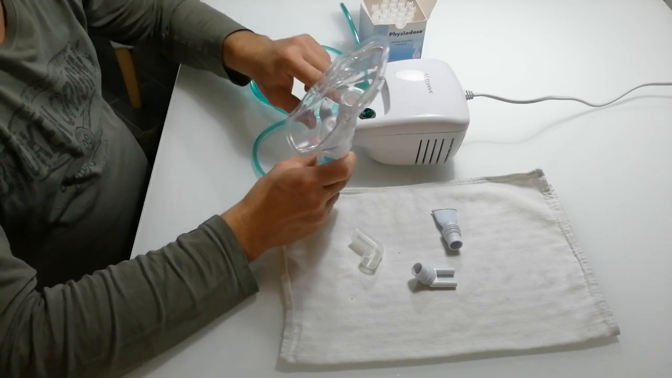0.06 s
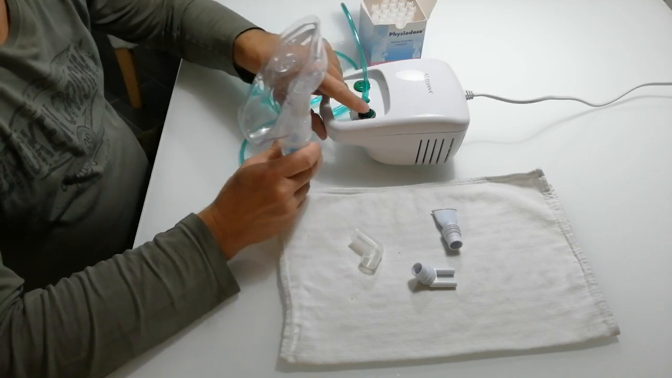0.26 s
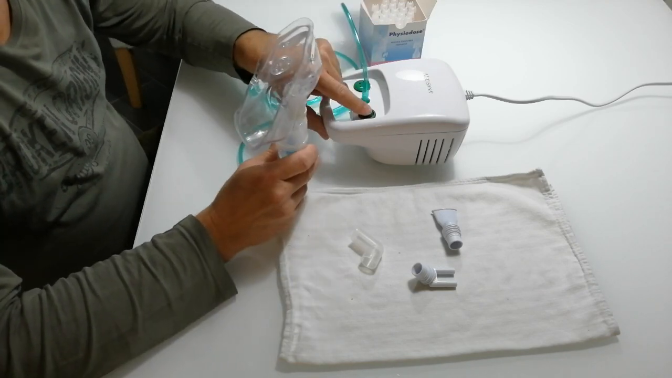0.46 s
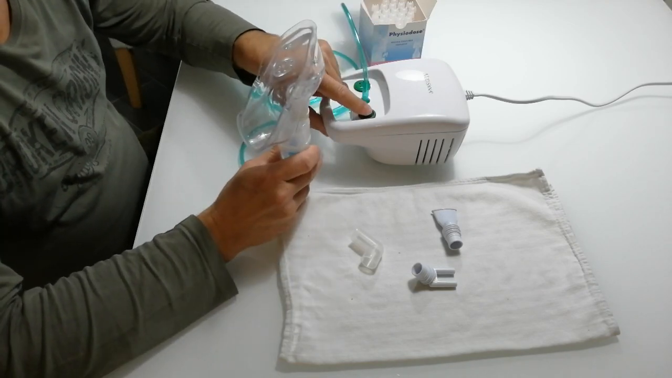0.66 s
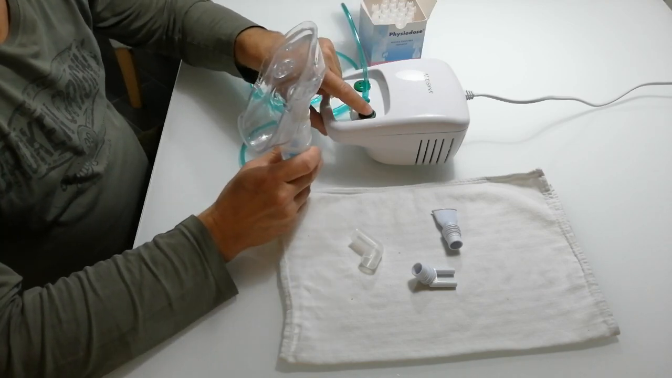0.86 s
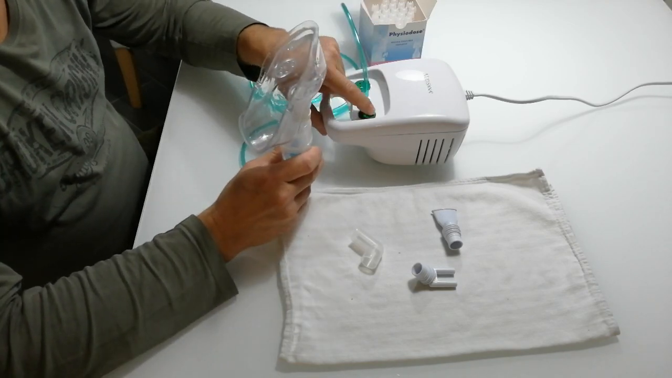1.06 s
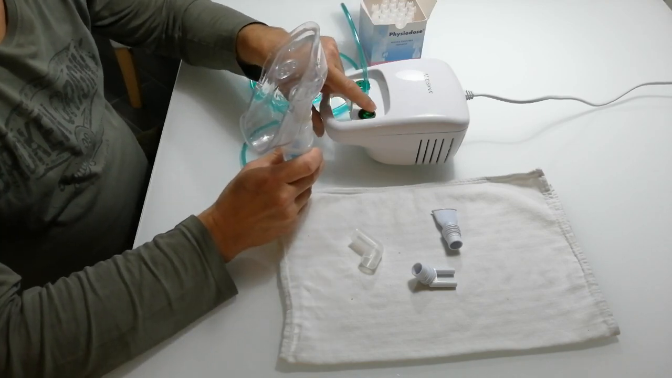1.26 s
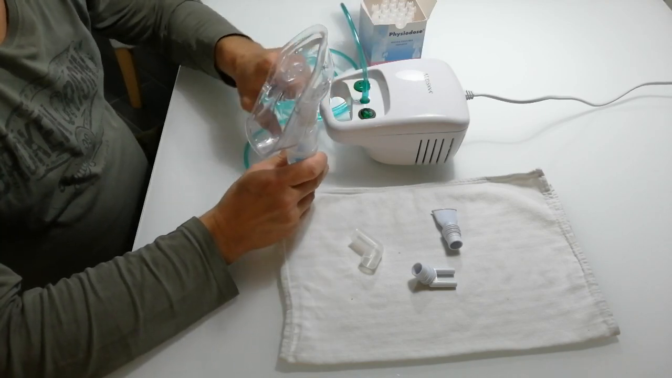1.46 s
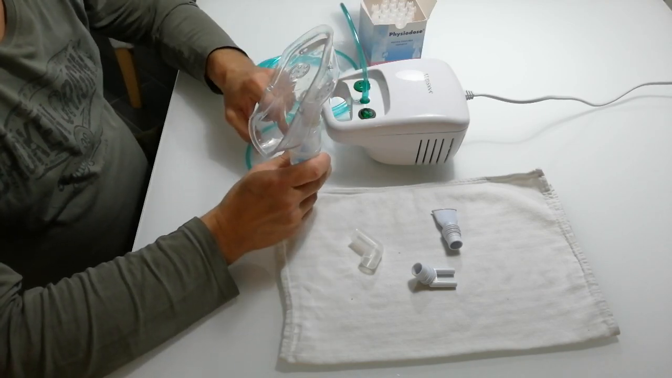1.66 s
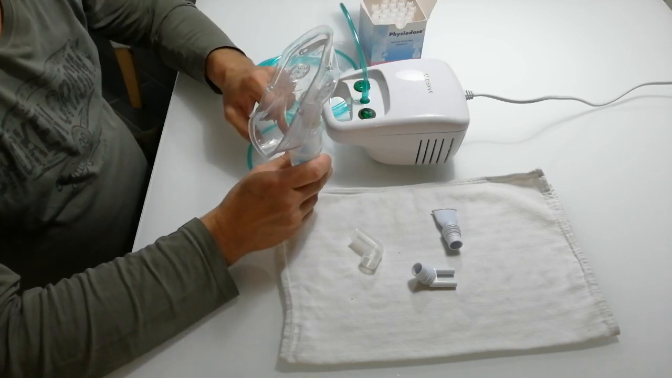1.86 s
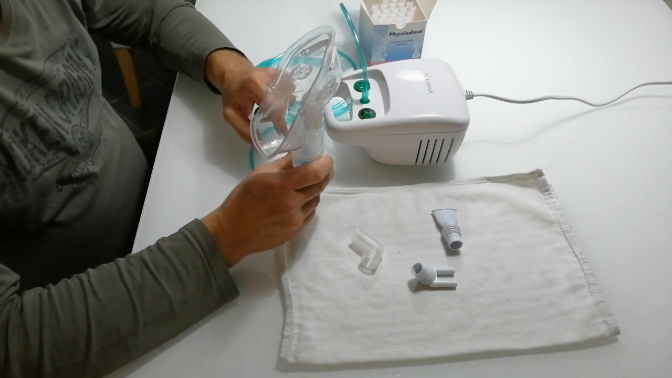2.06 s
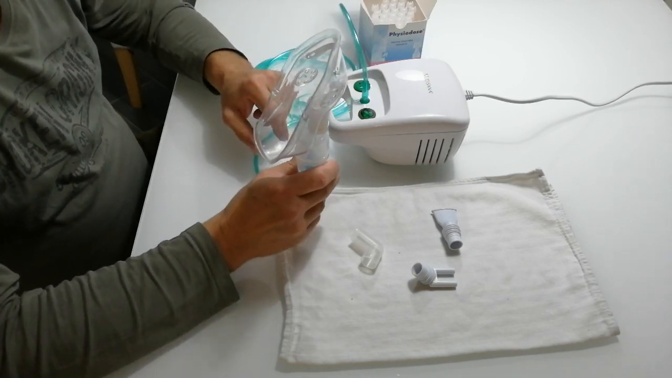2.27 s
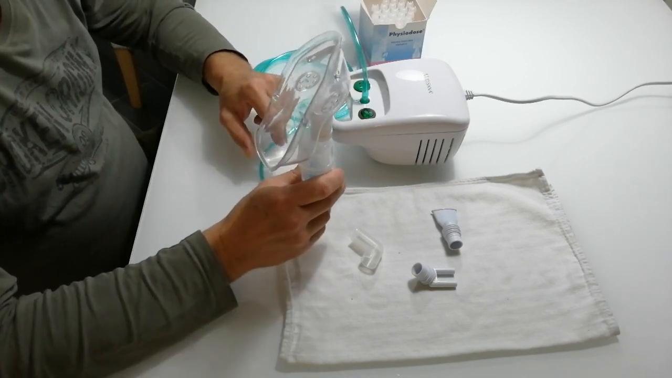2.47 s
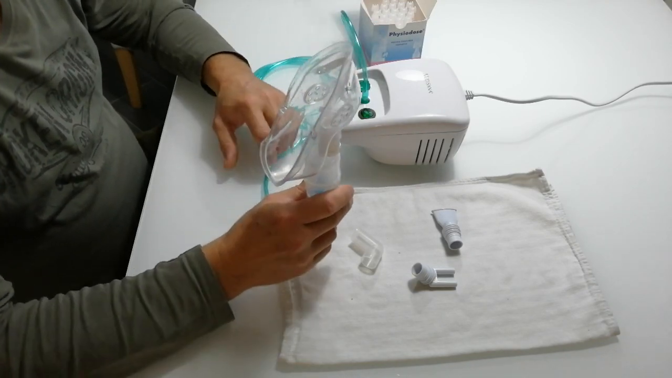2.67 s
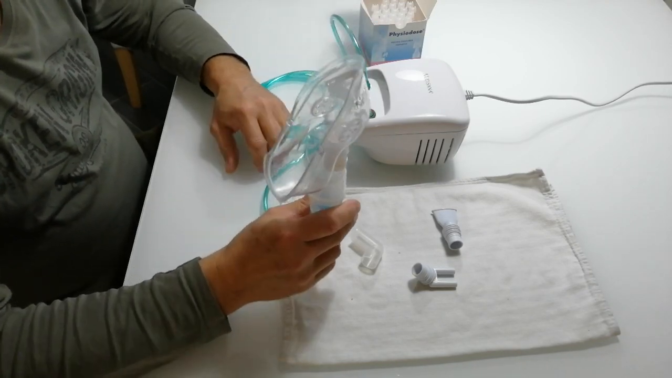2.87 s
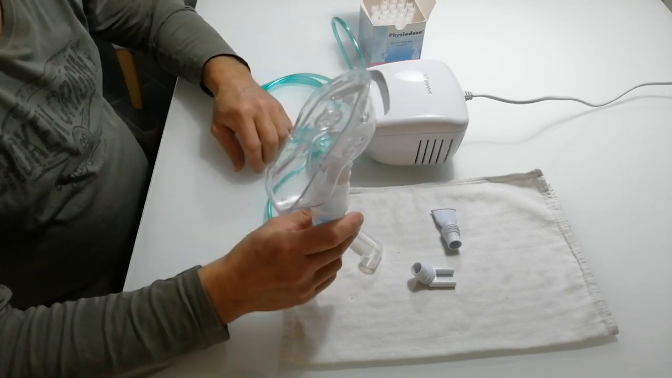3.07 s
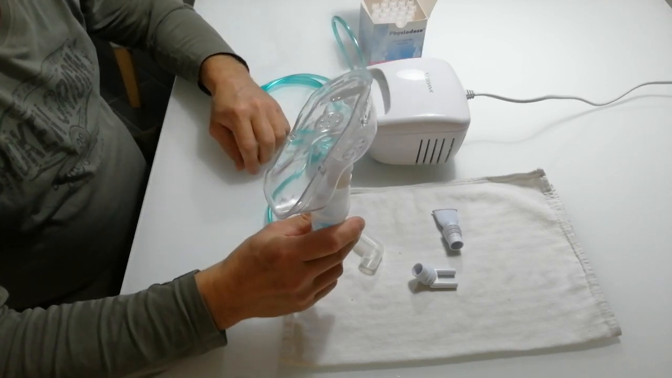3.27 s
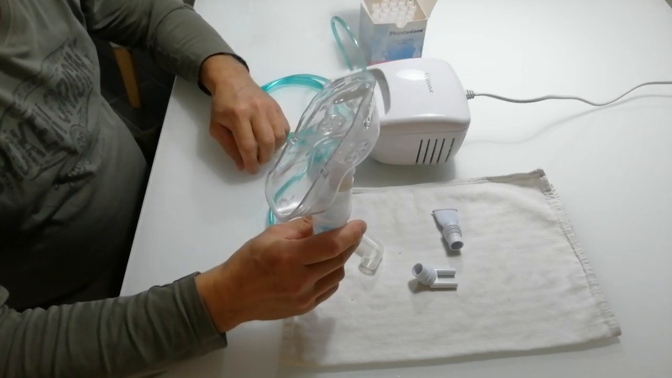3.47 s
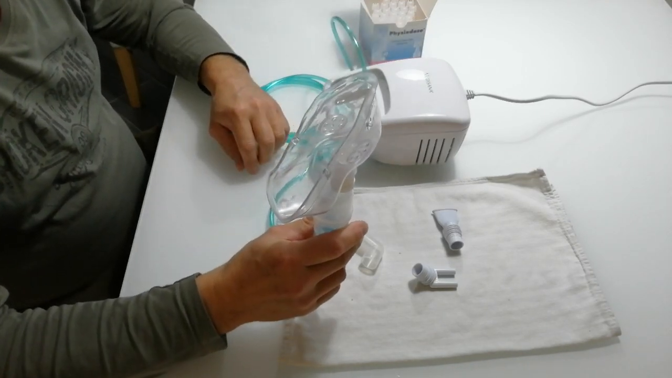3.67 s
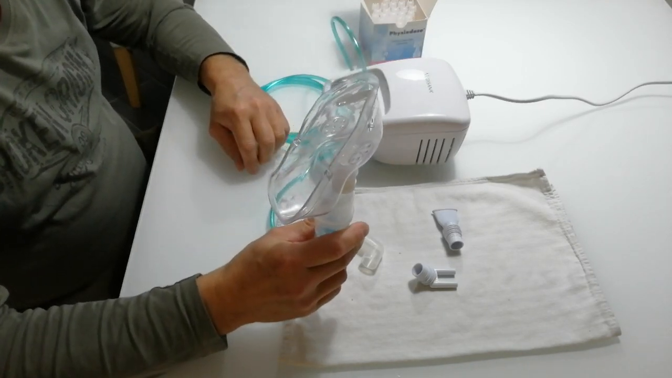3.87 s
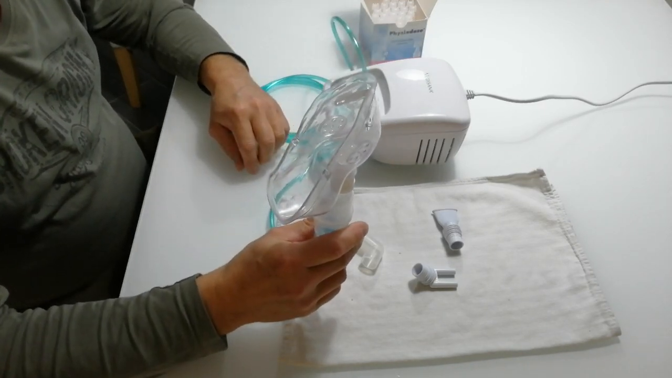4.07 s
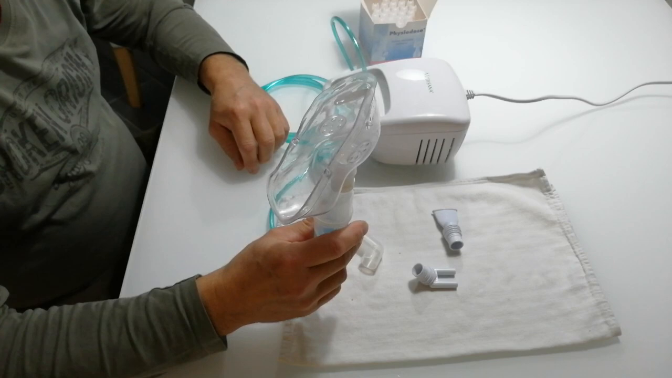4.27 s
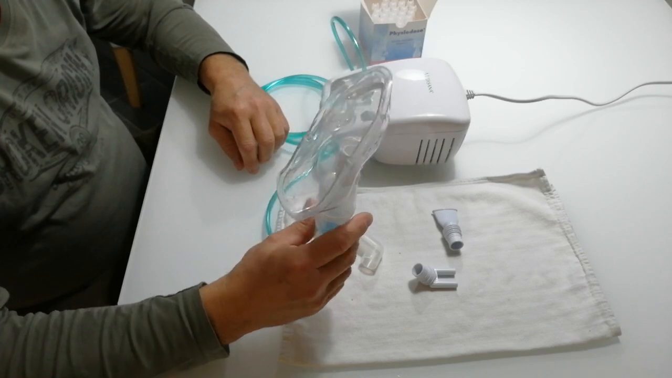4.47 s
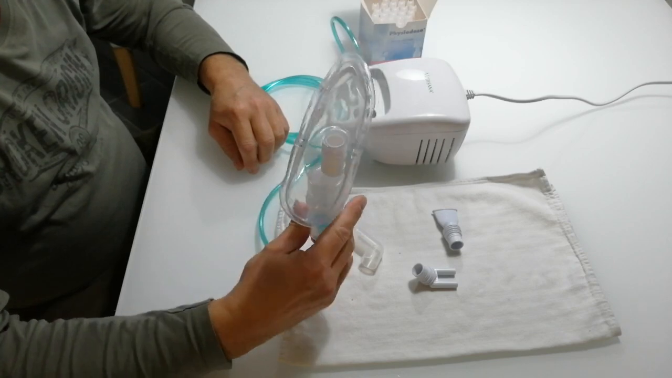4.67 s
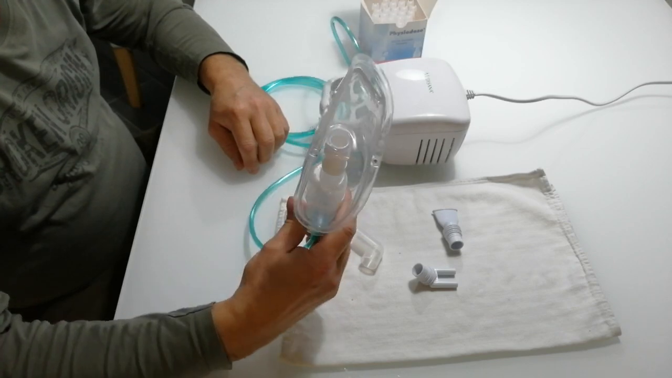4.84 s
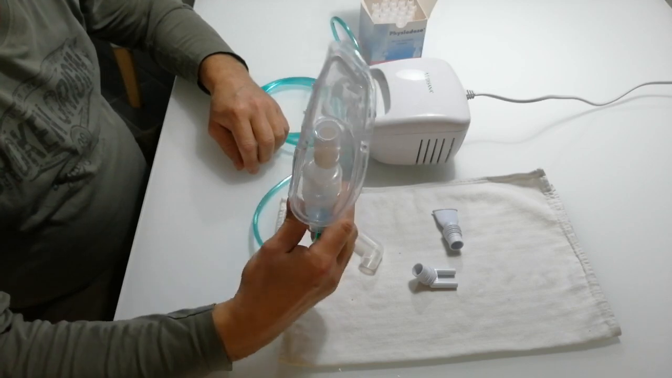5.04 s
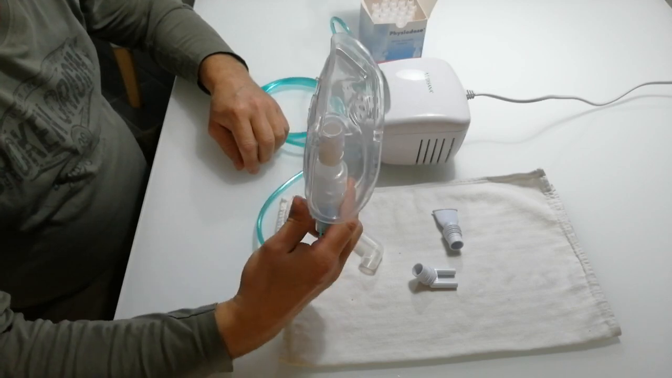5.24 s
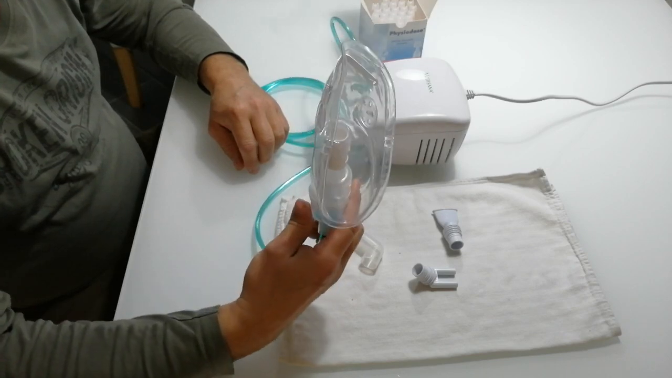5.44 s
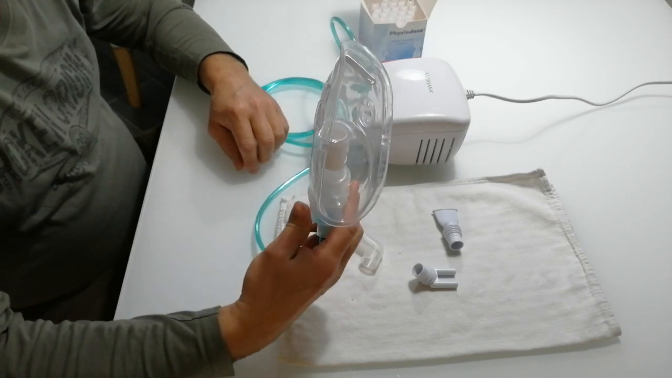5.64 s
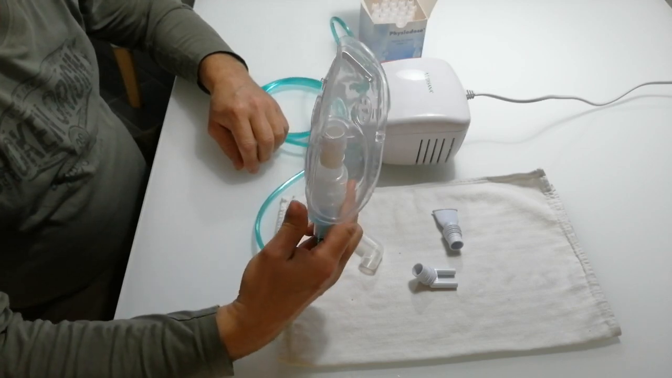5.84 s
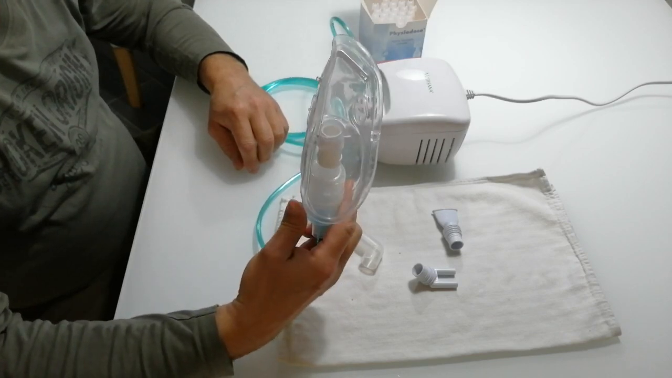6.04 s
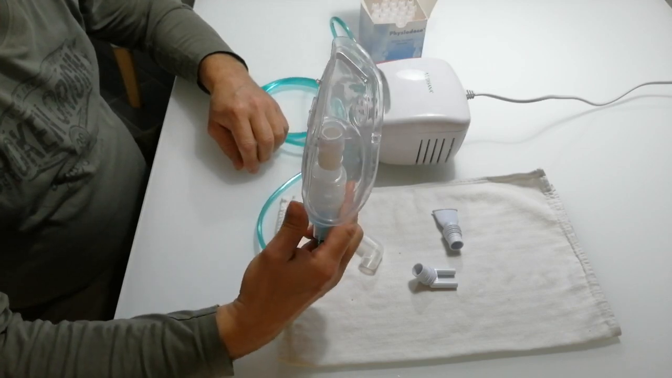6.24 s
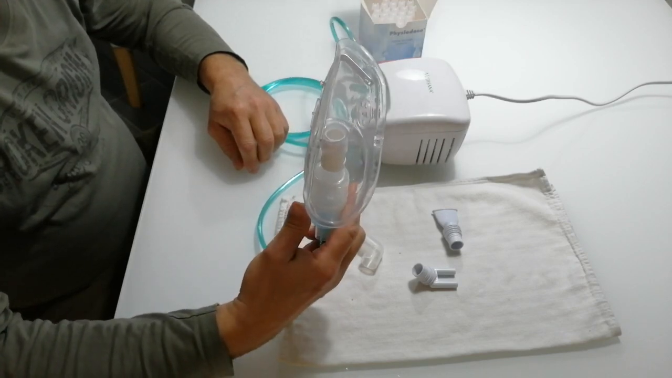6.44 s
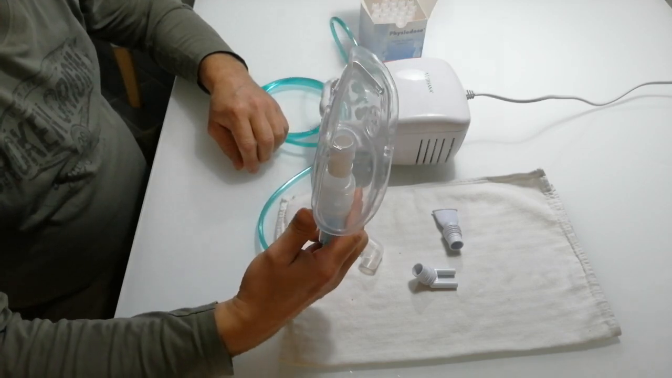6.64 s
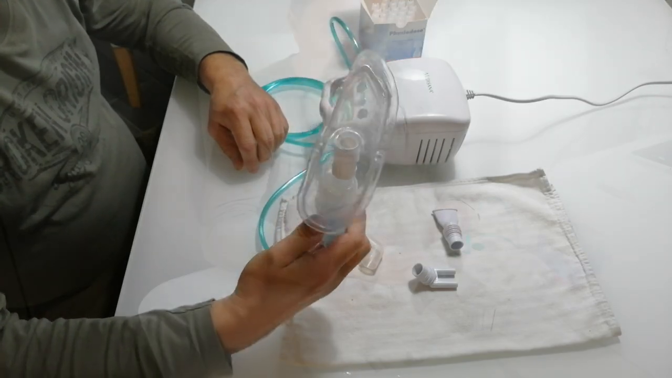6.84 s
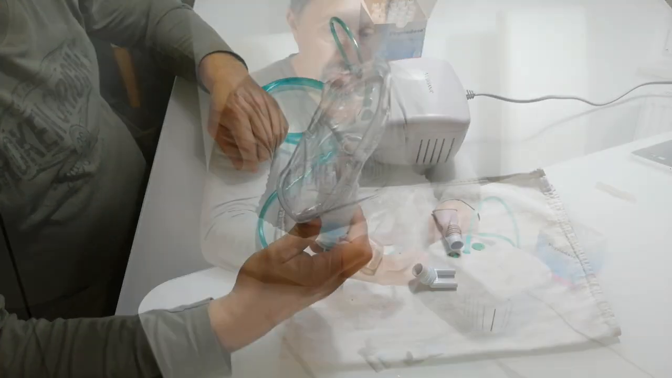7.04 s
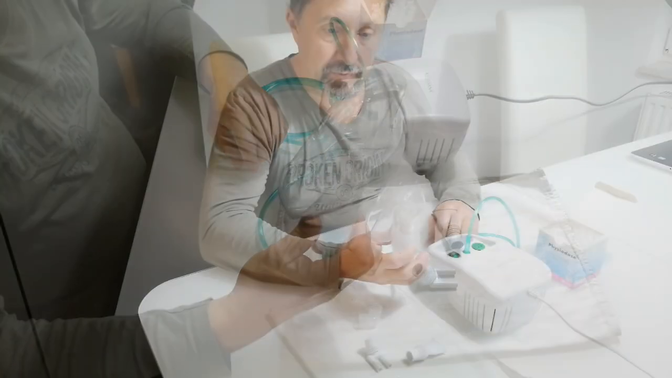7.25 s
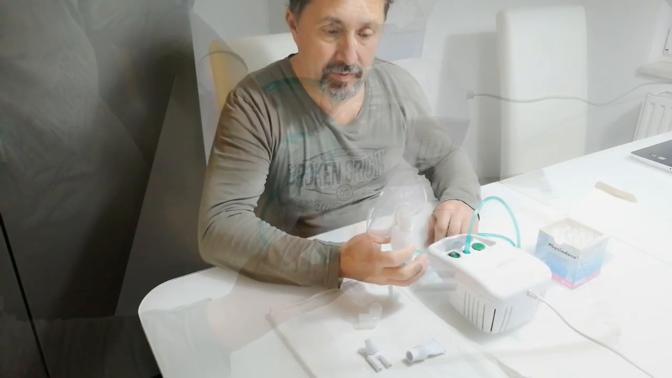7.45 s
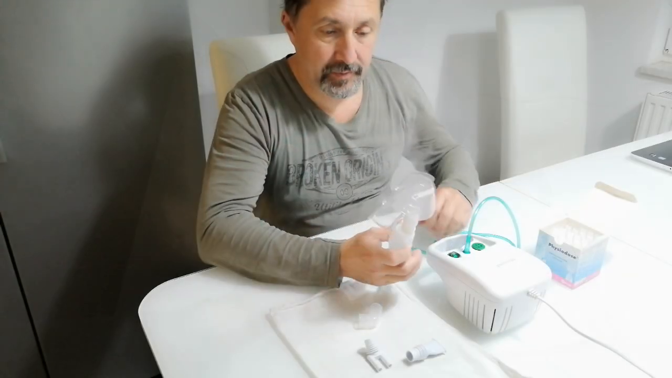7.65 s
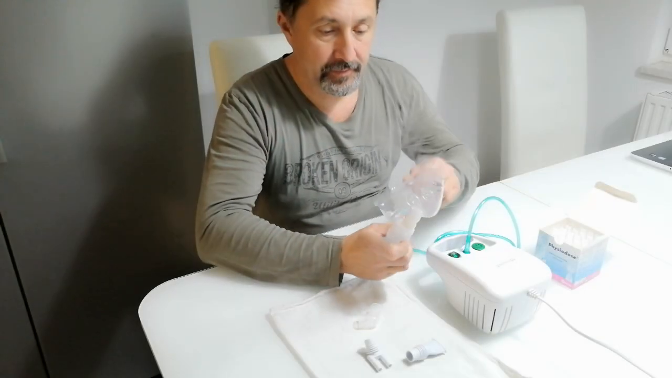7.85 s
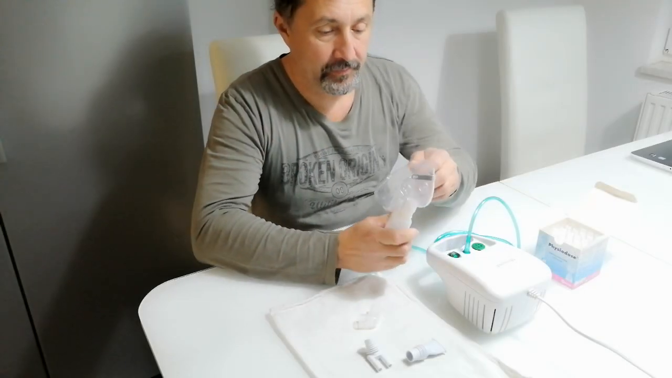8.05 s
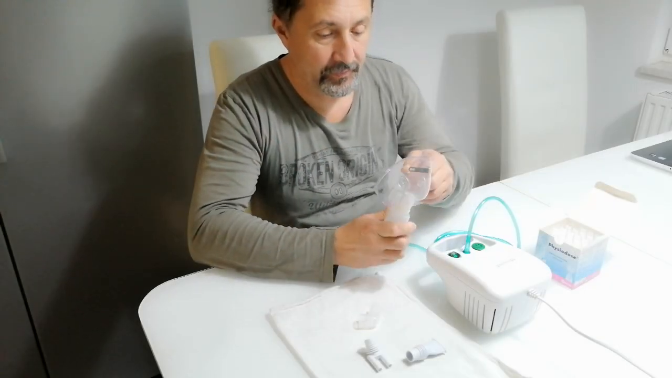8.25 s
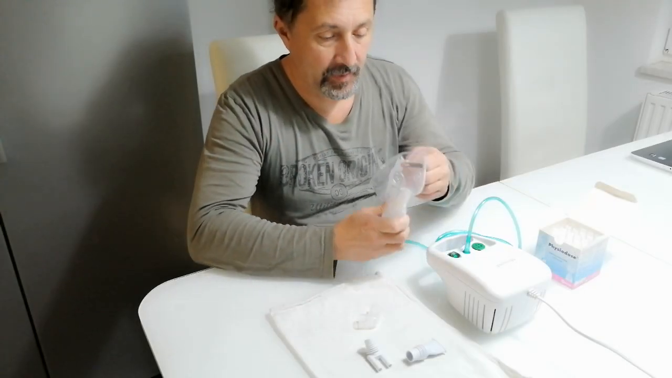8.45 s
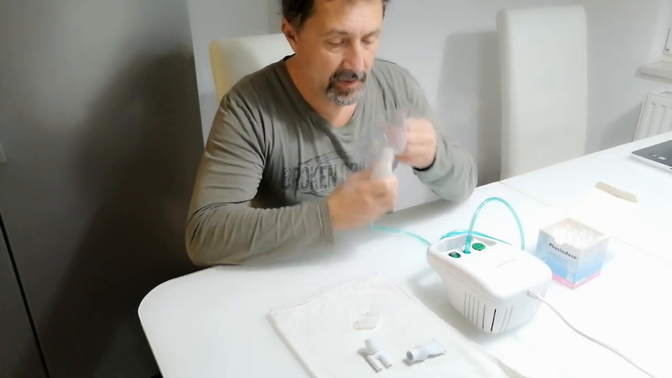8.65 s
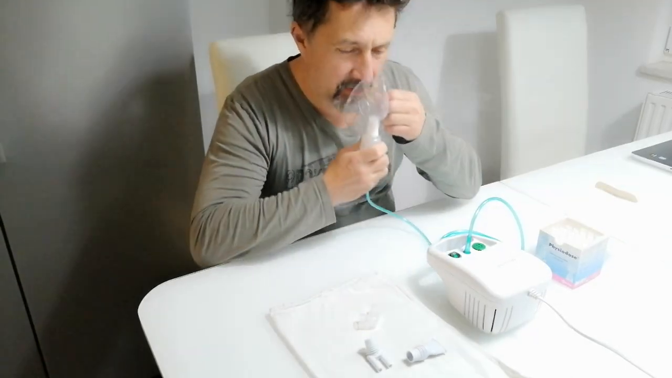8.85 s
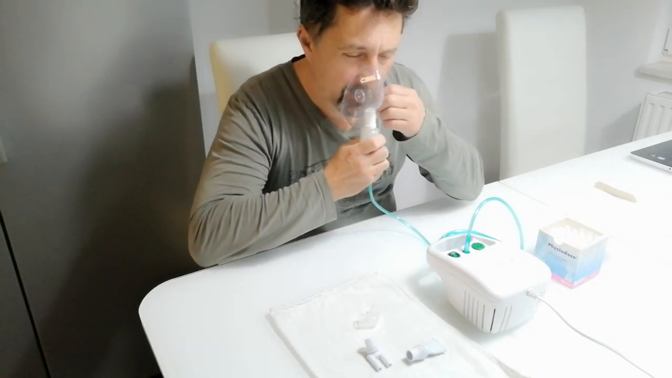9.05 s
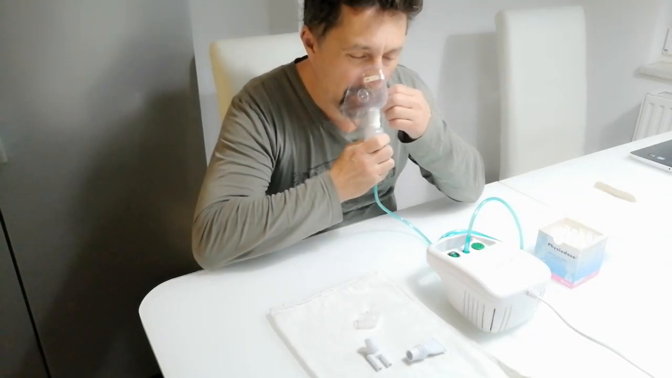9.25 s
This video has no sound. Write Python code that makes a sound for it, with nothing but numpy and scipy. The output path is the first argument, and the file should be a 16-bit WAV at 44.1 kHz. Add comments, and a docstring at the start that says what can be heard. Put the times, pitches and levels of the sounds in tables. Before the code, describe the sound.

In a quiet room, soft table bumps and a low rub, then a switch snaps and a small compressor buzzes steadily with hissing air.

```python
"""A small piston nebulizer on a table in a quiet room. Soft bumps boom the table's low modes, fingers brush
the plastic and something rubs out a low groan. The switch snaps, then the pump's piston orders hum at about
43 strokes a second while filtered noise makes the air jet hiss in the hand-held medicine cup. More bumps follow.
Later the listening point dissolves to a place further from the table: the hum changes colour, the jet and the
bass recede, and thin bands of noise whistle over the rim of the mask."""
import sys
import numpy as np
from scipy import signal
from scipy.fft import rfft, irfft
from scipy.io import wavfile
from scipy.ndimage import uniform_filter1d, map_coordinates

SR = 44100
rng = np.random.default_rng(int(sys.argv[2]) if len(sys.argv) > 2 else 0)


def waveform_to_disk(signal):
    """Save audio, clipped to [-1, 1], as 16-bit WAV at the path in sys.argv[1]."""
    frames = np.transpose(np.atleast_2d(signal))
    scaled = np.clip(frames, -1, 1) * 32767
    samples = np.round(scaled).astype(np.int16)
    wavfile.write(sys.argv[1], SR, samples)


N = 410571
T = np.arange(N) / SR

MOTOR_ON_S = 1.24

# outline of the nozzle's high sizzle, also of brushed plastic: (frequency [Hz], level [dB])
NOZZLE_OUTLINE = [(9000, -9.5), (10000, -8), (10600, 3), (11200, 7), (11700, 3.5), (12500, 3.5),
                  (13000, -3), (14000, -10.5), (15200, -9)]
# outline of the cooling air through the vents, also of the rumble on the feet: (frequency [Hz], level [dB])
VENT_OUTLINE = [(20, -34), (40, -11), (70, -20), (150, -1.5), (350, -6), (620, 5.5), (850, -10.5),
                (1300, -10.5), (1700, -28), (2500, -21.5), (5000, -34)]


def undb(db):
    """Decibels to gain."""
    return 10 ** (np.asarray(db) / 20)


def curve(rows, axis=1):
    """One column of a table, joined by straight lines in time."""
    rows = np.array(rows)
    return np.interp(T, rows[:, 0], rows[:, axis])


def unit(x):
    """Scale to rms 1."""
    return x / np.sqrt(np.mean(x ** 2))


def colour(x, points):
    """Filter by a (frequency [Hz], level [dB]) outline, straight over log frequency, and scale to rms 1."""
    hz, db = np.transpose(points)
    f = np.maximum(np.fft.rfftfreq(2 ** 19, 1 / SR), 1)
    gain = undb(np.interp(np.log(f), np.log(hz), db))
    spectrum = rfft(x, 2 * (len(f) - 1))
    return unit(irfft(spectrum * gain)[..., :N])


def noise(points, side):
    """Coloured stereo noise; side weighs the part that is opposite in the two ears."""
    mid, other = rng.standard_normal((2, N))
    return colour(np.array([mid + side * other, mid - side * other]), points)


def walk(rate):
    """Random wander with a spread near 1, taking rate new values a second."""
    steps = rng.standard_normal(2048)
    return np.interp(T * rate, np.arange(len(steps)), steps)


def pan(db):
    """Gains for a left-minus-right level."""
    return undb(np.array([[db], [-db]]) / 2)


def fall(start, t60):
    """A decay that begins at start and loses 60 dB in t60 seconds."""
    return (T >= start) * undb(-60 * np.maximum(T - start, 0) / t60)


def ramp(start, length):
    """A straight rise from 0 to 1."""
    return np.clip((T - start) / length, 0, 1)


def swell(peak, rise, decay):
    """A smooth bell with its own time for each flank."""
    return np.exp(-((T - peak) / np.where(T < peak, rise, decay)) ** 2)


def note(full, attack, hold, t60):
    """Attack up to the time full, hold, then an exponential release."""
    release = np.exp(-np.log(1000) * np.maximum(T - full - hold, 0) / t60)
    return ramp(full - attack, attack) * release


def settle(time_constant):
    """An approach from 0 to 1 that begins when the motor starts."""
    return 1 - np.exp(-np.maximum(T - MOTOR_ON_S, 0) / time_constant)


def thin(x, hz):
    """Take the bass away."""
    return signal.sosfilt(signal.butter(2, hz, "high", fs=SR, output="sos"), x)


def shelf(x, hz, db):
    """Raise or lower everything above hz by db."""
    high = signal.sosfiltfilt(signal.butter(4, hz, "high", fs=SR, output="sos"), x)
    return x + (undb(db) - 1) * high


def reflections(x, t60):
    """Dense wall echoes, different at each ear, from a decaying noise tail."""
    t = T[:SR // 2]
    tail = rng.standard_normal((2, len(t))) * np.exp(-np.log(1000) * t / t60) * (t > .003)
    tail = tail / np.sqrt(np.sum(tail ** 2) / 2)
    return signal.fftconvolve(x[None], tail, axes=1)[:, :N]


def strokes(turns, orders, scatter, flutter_db, spread):
    """One causal knock of the piston per turn, as a stack of orders; the room smears the higher ones between the ears."""
    k, db = np.transpose(orders)
    # the minimum phase that belongs to the order levels packs each knock's energy at its start
    size = 256
    cepstrum = irfft(np.log(undb(np.interp(np.arange(size // 2 + 1), k, db))))
    lag = rfft(2 * cepstrum[:size // 2], size).imag
    out = np.zeros((2, N))
    for order, gain in zip(k.astype(int), undb(db)):
        smear, apart = rng.standard_normal(2)
        angle = (2 * np.pi * (order * turns % 1) + lag[order] + scatter * smear).astype(np.float32)
        width = np.float32(min(spread * order, 1) * np.sign(apart) / 2)
        flutter = 1 + (undb(flutter_db) - 1) * walk(25)
        out += gain * flutter * np.array([np.sin(angle + width), np.sin(angle - width)])
    return unit(out)


def compressor(pressure, far):
    """Piston orders slow and change colour as the pump takes up its load; the strokes come slightly unevenly."""
    # what the housing radiates running free: (multiple of the stroke rate, level [dB])
    free_orders = [(1, -19.5), (2, -16.5), (3, -20), (4, -6), (5, -18), (6, -28.5), (7, -14.5), (8, -10),
                   (9, -10), (10, -24), (11, -6), (12, -39), (13, -5), (14, -2), (15, -5.5), (16, -28),
                   (17, -38), (18, -15), (19, -29)]
    # what it radiates under pressure: (multiple of the stroke rate, level [dB])
    loaded_orders = [(1, -15.5), (2, -8.5), (3, -13), (4, 2), (5, -4.5), (6, -15), (7, 1.5), (8, -14.5),
                     (9, -9), (10, -0.5), (11, -5), (12, 1.5), (13, 2), (14, 4.5), (15, -5), (16, -10),
                     (17, -7.5), (18, -7), (19, -26), (20, -13), (21, -33.5), (22, -9.5), (23, -41),
                     (24, -15), (25, -17), (26, -5), (27, -20.5), (28, -15.5), (29, -11), (30, -8.5),
                     (31, -11), (32, -23.5), (33, -17), (34, -18.5), (35, -43.5), (36, -18.5), (37, -44),
                     (38, -31), (39, -62), (40, -37), (41, -70), (42, -42), (43, -18.5), (44, -34),
                     (45, -16), (46, -28.5), (47, -26), (48, -23)]
    # what arrives further off: (multiple of the stroke rate, level [dB])
    far_orders = [(1, -37), (2, -27), (3, -33), (4, -12), (5, -22), (6, -34), (7, -15), (8, -15), (9, -13),
                  (10, -20), (11, -16), (12, -22), (13, -18), (14, 0), (15, -22), (16, -23), (17, -34),
                  (18, -37), (19, -41), (20, -33), (21, -37), (22, -34), (23, -42), (24, -28), (25, -25),
                  (26, -34), (27, -30), (28, -25), (29, -25), (30, -39), (31, -32), (32, -35), (33, -27),
                  (34, -40), (35, -32), (36, -38), (37, -37)]
    loaded_speed_hz, sag_hz, sag_time_s, far_speed_hz = 42.82, 2.25, .55, 43.27
    free_db, loaded_db, far_db = -35, -37, -35

    # the speed sags as back pressure builds in the hose
    speed = loaded_speed_hz + sag_hz * (1 - settle(sag_time_s))
    turns = np.cumsum(speed) / SR + .0013 * walk(40)
    load = ramp(1.38, .9)
    running = ramp(MOTOR_ON_S, .16) ** 2 * undb(free_db + (loaded_db - free_db) * pressure)
    free = strokes(turns, free_orders, scatter=0.97, flutter_db=2.0, spread=0.1)
    loaded = strokes(turns, loaded_orders, scatter=.15, flutter_db=.5, spread=.055)
    # the loaded hum slowly grows buzzier
    buzz_db = -4 + 4.5 * ramp(3.6, 2.5)
    loaded = shelf(loaded, hz=696, db=buzz_db)
    # the valve sings on one order of the stroke for a while as the pressure builds
    singing = undb(-47) * note(full=2.33, attack=.25, hold=1.9, t60=1.4)
    valve = np.sqrt(2) * singing * np.cos(2 * np.pi * 17 * turns)
    vents = noise(VENT_OUTLINE, side=0.67) * undb(-13.0)
    hum = (1 - load) * free + load * loaded
    near = running * (hum + vents) * pan(db=-2.0) + valve

    # further off, the bass that the table top radiates is lost
    thin_vents = thin(vents, hz=150) * undb(-3.0)
    far_turns = far_speed_hz * T + .0015 * walk(40)
    distant = strokes(far_turns, far_orders, scatter=.8, flutter_db=.6, spread=.04) + thin_vents
    distant = distant * undb(far_db) * pan(db=-1.5)
    return np.sqrt(1 - far) * near + np.sqrt(far) * distant


def spin_up(ring_hz):
    """The starting motor shakes the housing at its main resonance, in throbs, and rumbles on its feet."""
    peak_s, throb_hz, throb_depth = 1.288, 39.5, .55
    throb = 1 + throb_depth * np.cos(2 * np.pi * throb_hz * (T - peak_s))
    shake = undb(-40) * note(peak_s, attack=0.042, hold=.028, t60=0.49) * throb
    ring = np.sqrt(2) * np.sin(2 * np.pi * ring_hz * T + 0.35 * walk(40.5))
    rumble = noise(VENT_OUTLINE, side=.4) * undb(-43.0) * swell(1.364, rise=0.097, decay=0.17)
    return ring * shake + rumble


def spray(points, lag_ms, echo, room_db):
    """Jet noise heard directly and off the walls; the table's echo combs it, and the comb slides with the hand."""
    # detour of the echo off the table as the hand moves the mask: (time [s], delay [ms])
    echo_detour = [(1.8, 1.3), (3.1, 1.7), (4.5, 1.7), (5.3, 2.2), (6.8, 2.15), (8.1, 1.5), (9.3, 1.9)]
    flicker_db = 1.16 * walk(60) + 0.49 * walk(6.5)
    jet = colour(rng.standard_normal(N), points) * undb(flicker_db)
    path_ms = curve(echo_detour) + 0.0032 * walk(2.1)
    jet = jet + echo * map_coordinates(jet, [np.arange(N) - path_ms * SR / 1000], order=3)
    # the right ear hears the jet slightly later
    direct = np.array([jet, np.roll(jet, round(lag_ms * SR / 1000))])
    return unit(direct + undb(room_db) * reflections(jet, t60=0.25))


def nebulizer(pressure, far):
    """Jet noise rings the cup's cavities; its highest sizzle beams to the left."""
    # the jet through the cup's cavities: (frequency [Hz], level [dB])
    cup_outline = [(1500, -19.5), (2400, -25), (3000, -16.5), (3450, -25.5), (4250, -13.5), (4700, -17.5),
                   (5030, -2.5), (5300, -2.5), (5650, -9), (6300, 1.5), (6700, -6.5), (7300, -8.5),
                   (8000, -28), (9200, -22.5), (10500, -34.5)]
    # turns of the mask that swing the nozzle towards the listener: (time [s], half length [s], sizzle boost [dB])
    mask_turns = [(4.95, 0.45, 2), (8.42, 0.2, 4), (9.02, 0.26, 5)]
    leak_db, jet_db, pressure_db = -56, -39, 1.0
    far_jet_db, far_top_db = -10, 4.5
    sizzle_db, far_sizzle_db = -11.5, -4  # relative to the cup

    cup = spray(cup_outline, lag_ms=.045, echo=0.034, room_db=2) * pan(db=-3.0)
    nozzle = spray(NOZZLE_OUTLINE, lag_ms=.045, echo=.42, room_db=6.5) * pan(db=14.5)
    # a first leak, then the full stream
    flow = undb(leak_db) * ramp(1.288, 0.01) + undb(jet_db) * ramp(1.36, 0.039)
    # the near jet fades late in the dissolve; mainly the cup's ring remains
    gone = ramp(7.23, .65)
    cup = shelf(cup, hz=4100, db=far_top_db * gone)
    level_db = pressure_db * pressure + far_jet_db * gone
    turned_db = sum(db * swell(s, half, half) for s, half, db in mask_turns)
    nozzle_db = sizzle_db + far_sizzle_db * far + turned_db
    return flow * undb(level_db) * (cup + undb(nozzle_db) * nozzle)


def whistles():
    """Air over the rim of the mask: narrow wavering bands of noise, beamed to the left."""
    # brief whistles: (time [s], half length [s], frequency [Hz], level [dB])
    rim_whistles = [(8.38, .07, 10850, -62), (8.48, .05, 10480, -62), (8.985, 0.073, 10300, -59)]
    width_hz = 160  # new random values a second; faster wander widens the band
    out = 0
    for s, half, hz, db in rim_whistles:
        angle = 2 * np.pi * hz * T
        band = walk(width_hz) * np.sin(angle) + walk(width_hz) * np.cos(angle)
        out = out + undb(db) * swell(s, half, half) * band
    return (out + reflections(out, t60=.28)) * pan(db=12)


def switch():
    """A sharp plastic snap of noise rings the cap's damped modes and dies away in the room."""
    # outline of the snap: (frequency [Hz], level [dB])
    snap_outline = [(200, -22), (1000, -6.5), (1650, 1), (2200, 9), (2950, 3), (4200, -10), (5400, -4),
                    (6600, -10), (8500, -3), (10600, -1), (13000, -18), (15000, -24)]
    # ring of the switch cap: (frequency [Hz], level [dB], t60 [s])
    cap_modes = [(1630, -44, 0.082), (2080, -57, 0.25), (2390, -54, 0.18), (2760, -52, 0.13),
                 (2900, -52, 0.1), (5300, -52, .04)]
    click_s = 1.1375
    snap = noise(snap_outline, side=0.73) * undb(-36.0) * fall(click_s, t60=0.034)
    ring = sum(undb(db) * fall(click_s, t60) * np.sin(2 * np.pi * hz * (T - click_s))
               for hz, db, t60 in cap_modes)
    # the room's answer is duller by 2.7 dB an octave
    duller = [(hz, db - 2.7 * np.log2(hz)) for hz, db in snap_outline]
    room_tail = noise(duller, side=0.93) * undb(-44.5) * fall(click_s, t60=0.5)
    return snap + ring + room_tail


def groan():
    """Something rubs over the table: a low tone droops as it presses harder, and its overtones grow."""
    force = swell(0.849, rise=0.11, decay=.1)
    rub_hz = 96 - 5.9 * force + 0.88 * walk(25)
    angle = 2 * np.pi * np.cumsum(rub_hz) / SR
    overtones = undb(-8.5) * np.sin(2 * angle) + undb(-28) * np.sin(3 * angle)
    tone = np.sin(angle) + force * overtones
    return np.sqrt(2) * undb(-35) * force * tone * pan(db=-5.0)


def bumps():
    """Soft blows set the table's dense low modes booming, as decaying noise in two bands."""
    # bumps against the table: (time [s], level [dB], t60 [s], treble relative to the body [dB])
    table_bumps = [(0.276, -43, 0.42, 7), (0.291, -47.5, 0.73, 2), (.412, -45, 0.34, -3),
                   (.44, -56, 0.26, -6), (2.195, -41, 0.27, 4), (2.222, -42.5, 0.3, 4), (4.08, -45, .3, 9),
                   (4.105, -44.5, 0.25, 8), (5.95, -41, .3, 1), (5.973, -45.5, 0.41, 11),
                   (7.625, -39, 0.25, -3), (7.65, -41, 0.25, 7), (7.765, -42, 0.3, 3),
                   (7.795, -44, 0.37, -8)]
    # outline of the table's modes: (frequency [Hz], level [dB])
    table_outline = [(30, -20), (60, -2), (120, 7.5), (180, 1), (250, -1.5), (450, -11.5), (600, -16.5),
                     (1100, -21.5), (1700, -30), (3000, -42), (8000, -65)]
    boom = noise(table_outline, side=0.3)
    low = signal.sosfilt(signal.butter(2, 500, fs=SR, output="sos"), boom)
    high = thin(boom, hz=500)
    body = sum(undb(db) * fall(s, t60) for s, db, t60, _ in table_bumps)
    edge = sum(undb(db + treble_db) * fall(s, 1.1 * t60) for s, db, t60, treble_db in table_bumps)
    # a padded contact takes a few milliseconds to build
    body, edge = uniform_filter1d(np.array([body, edge]), size=120, axis=1)
    # opposite signs let the two bands join smoothly at the crossover
    return (low * body - high * edge) * pan(db=-1.0)


def touches():
    """Fingers brush the thin mask and the casing: faint decaying puffs of high noise."""
    # brushes on the plastic: (time [s], level [dB])
    finger_touches = [(.51, -71), (.77, -74)]
    return noise(NOZZLE_OUTLINE, side=.8) * sum(undb(db) * fall(s, t60=.25) for s, db in finger_touches)


def scene():
    """All sources over the quiet room; further from the table its bumps and the room's rumble lose their bass."""
    # outline of the room's noise: (frequency [Hz], level [dB])
    room_outline = [(20, -19), (45, 6.5), (80, -8), (125, 4), (200, 1), (450, -3), (800, -12),
                    (2000, -17.5), (4000, -24), (8000, -31), (15000, -45)]
    # the listening point moves away between these moments: (start [s], end [s])
    dissolve_s = (6.73, 7.88)
    far = np.interp(T, dissolve_s, (0, 1))
    pressure = settle(.93)
    around = noise(room_outline, side=0.78) * undb(-55.5) + bumps()
    around = (1 - far) * around + far * thin(around, hz=115)
    machine = compressor(pressure, far) + spin_up(ring_hz=642) + nebulizer(pressure, far)
    return machine + whistles() + groan() + touches() + switch() + around


def record(dry):
    """A steep low-pass cuts the top above 15150 Hz."""
    return signal.sosfilt(signal.ellip(10, .2, 80, 15150, fs=SR, output="sos"), dry)


dry = scene()
out = record(dry)
waveform_to_disk(out)
```